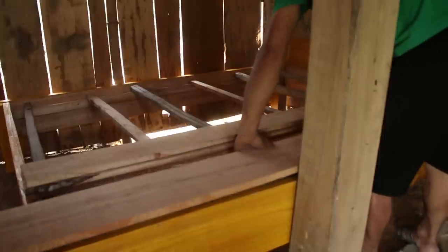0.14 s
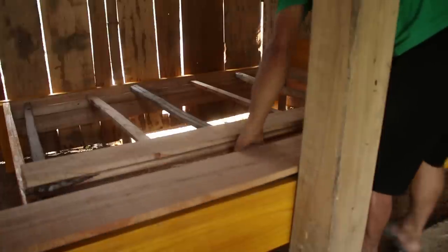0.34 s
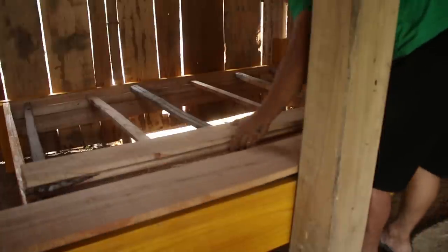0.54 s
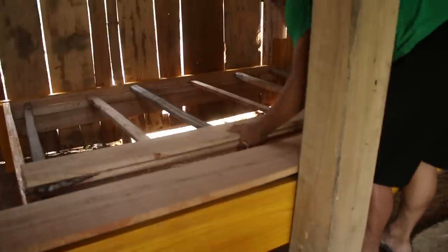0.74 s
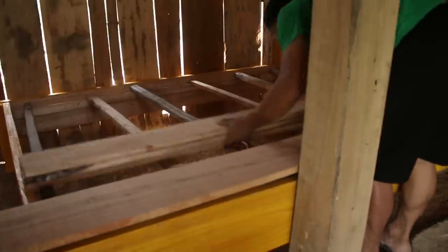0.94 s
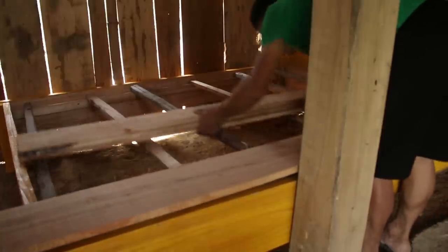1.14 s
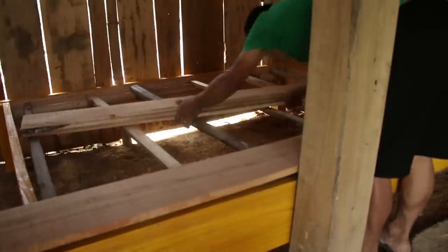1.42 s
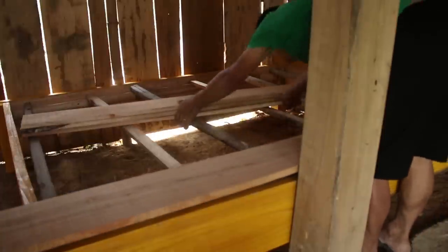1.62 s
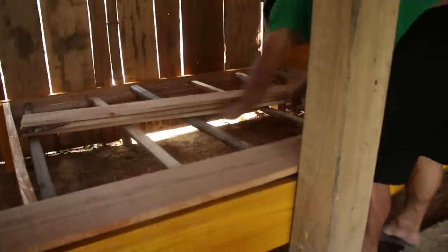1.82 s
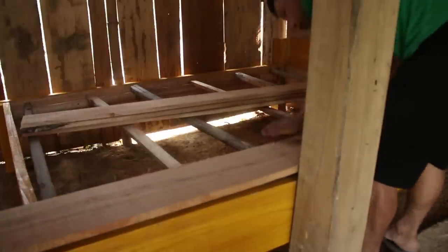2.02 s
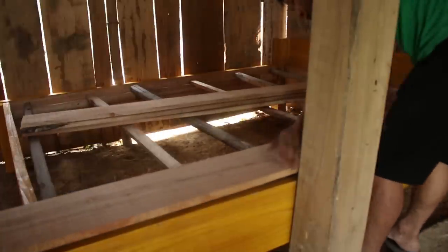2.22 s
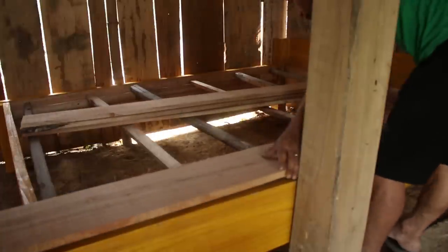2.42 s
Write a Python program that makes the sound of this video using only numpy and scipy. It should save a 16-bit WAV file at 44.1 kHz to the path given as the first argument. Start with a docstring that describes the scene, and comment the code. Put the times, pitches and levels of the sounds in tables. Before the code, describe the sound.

Wooden plank dropping with a rattle, sliding over bed slats and clacking against another board.

```python
"""A loose plank drops on a wooden bed frame and rattles, close to one microphone inside a board hut.
It scrapes across the slats, its fibres catching and slipping, then knocks against its neighbour;
each blow rings the modes of frame and plank. Light rubs, taps and soft thuds follow.
The board walls give every sound a short, dull tail, and faint outdoor air lies behind it all."""
import sys
import numpy as np
from scipy import signal
from scipy.io import wavfile
from scipy.ndimage import uniform_filter1d

SR = 44100
rng = np.random.default_rng(int(sys.argv[2]) if len(sys.argv) > 2 else 0)


def int16_out(signal):
    """Quantize to a 16-bit WAV file."""
    q = np.round(np.clip(np.atleast_2d(signal).T, -1, 1) * 32767)
    wavfile.write(sys.argv[1], SR, q.astype(np.int16))


N = 112454
T = np.arange(N) / SR
RING_WET_DB, CLATTER_WET_DB, RUB_WET_DB = -10, -11, -12.5  # hut tail against the direct sound

# modes of the bed frame and of the loose plank: (frequency [Hz], level [dB], t60 [s])
FRAME_MODES = [(121.6, -15.5, 0.11), (175, 1.5, 0.072), (184.4, -11.5, .27), (220, -10.5, 0.069),
               (380, 3, 0.074), (393.2, -13, 0.24), (416, -19.5, .33), (482.4, -15, 0.36), (643, -15, 0.16),
               (758, -21, .28), (1015, -22, 0.11), (1805, -12, .07)]
PLANK_MODES = [(390.2, -15.5, 0.3), (483, -13.5, 0.29), (551, -10, 0.18), (561, -17.5, .12),
               (625, -21, 0.42), (754, -14.5, 0.26), (901, -7, 0.18), (1018, -5.5, .2), (1081, -5.5, .18),
               (1147, -2, 0.16), (1201.5, -3, 0.067), (1293.6, -5, 0.1), (1379, -10.5, 0.1),
               (1562, -17, 0.12)]
# dense high-order ringing of the boards: (frequency [Hz], level [dB])
CLATTER_SPECTRUM = [(30, -30.5), (70, -21.5), (160, 0.5), (270, -2.5), (500, 4.5), (1100, 0.5), (1700, -1),
                    (2800, -15.5), (6000, -26.5), (15000, -43)]
# wood on wood, near the microphone:
# (time [s], frame gain [dB], plank gain [dB], clatter level [dB], clatter cutoff [Hz])
BLOWS = [(0.056, -46, -60, -48, 550), (0.2175, -11, -28.5, -20.5, 516), (0.233, -32, -36, -19, 1090),
         (0.245, -51, -40, -25.5, 1980), (0.2615, -40, -28, -24, 800), (0.284, -52, -40, -23, 920),
         (0.325, -44.5, -48, -36, 605), (1.3843, -28.5, -12, -17, 1650), (1.4005, -29.5, -20.5, -17, 1410),
         (1.422, -43, -26.5, -26.5, 910), (1.455, -34.5, -54, -33, 1300), (1.995, -76, -56, -60.5, 1540),
         (2.105, -62, -63, -56.5, 350), (2.3475, -50.5, -70, -46, 2020), (2.367, -46.5, -76, -49, 1830),
         (2.497, -83, -65.5, -54, 2500)]
def knocks(clatter_t60_s=0.064, rolloff_order=2.56):
    """Each blow rings frame and plank, with a burst of clatter whose brightness is set for each blow."""
    t = np.arange(SR // 2) / SR
    rings, bursts = np.zeros((2, N))
    frame, plank = ring(FRAME_MODES, t), ring(PLANK_MODES, t, alternate=True)
    fade = amp(-60 * t / clatter_t60_s)
    for start, frame_db, plank_db, clatter_db, cutoff_hz in BLOWS:
        def contact_db(hz):
            return read(CLATTER_SPECTRUM, hz) - 10 * rolloff_order * np.log10(1 + (hz / cutoff_hz) ** 2)
        clatter = colour(rng.standard_normal(len(t)), contact_db) * fade
        add(bursts, start, amp(clatter_db) * clatter * np.linalg.norm(fade) / np.linalg.norm(clatter))
        add(rings, start, .5 * (amp(frame_db) * frame + amp(plank_db) * plank))
    return hut(rings, RING_WET_DB) + hut(bursts, CLATTER_WET_DB)


def ring(modes, t, alternate=False, contact_s=.0009):
    """Struck wood rings in decaying sines; away from the struck point, neighbours alternate in sign."""
    sines = np.zeros(len(t))
    for k, (hz, db, t60) in enumerate(modes):
        sign = -1 if alternate and k % 2 else 1
        sines += sign * amp(db - 60 * t / t60) * np.sin(2 * np.pi * hz * t)
    return sines * np.tanh(t / contact_s) ** 2


# the long slide across the slats: (time [s], body level [dB], hiss level [dB])
SLIDE_LEVELS = [(0.852, -91, -88), (0.911, -53, -64), (0.973, -39.5, -76), (1.025, -43, -54),
                (1.125, -35.5, -50.5), (1.158, -38.5, -49.5), (1.2, -38.5, -52), (1.251, -37, -49.5),
                (1.3, -40, -52), (1.38, -37.5, -53), (1.47, -47.5, -57.5), (1.56, -49, -65),
                (1.62, -74, -94)]
# short rubs of wood and hands:
# (middle [s], half length [s], body level [dB], hiss level [dB], resonance [Hz])
SHORT_RUBS = [(0.048, 0.16, -62, -71.5, 834), (0.213, 0.097, -48, -62.5, 1540),
              (0.244, 0.064, -41.5, -68, 1460), (0.444, 0.27, -66.5, -68.5, 1670),
              (0.543, 0.1, -65.5, -72.5, 1950), (0.70, 0.21, -59, -67, 1350), (1.726, .13, -58, -68, 1087),
              (1.875, 0.21, -69, -71.5, 1378), (1.935, 0.087, -62, -71, 1037),
              (2.215, 0.036, -81.5, -98, 768), (2.317, 0.041, -68, -81, 906),
              (2.366, 0.053, -62.5, -67, 1540), (2.51, 0.14, -69.5, -81, 654)]
# hiss at the point of contact: (frequency [Hz], level [dB])
HISS_SPECTRUM = [(500, -37), (2000, 9), (3500, 4), (5000, 1.5), (7000, -3.5), (10000, -7.5), (11500, -16),
                 (15500, -16)]
def scraping(tone_db=-3, tone_q=5.4):
    """Friction drives the plank's body and a contact hiss; each short rub adds its own resonance."""
    times, slide_body_db, slide_hiss_db = np.transpose(SLIDE_LEVELS)
    body_gain = np.interp(T, times, amp(slide_body_db), left=0, right=0)
    hiss_gain = np.interp(T, times, amp(slide_hiss_db), left=0, right=0)
    slips, creaks, tones = grains(), grains(), np.zeros(N)
    for middle, half_length, body_db, hiss_db, tone_hz in SHORT_RUBS:
        stroke = swell(middle, half_length)
        body_gain += amp(body_db) * stroke
        hiss_gain += amp(hiss_db) * stroke
        b, a = signal.iirpeak(tone_hz, tone_q, fs=SR)
        resonance = unit(signal.lfilter(b, a, signal.lfilter(b, a, creaks)))
        tones += amp(body_db + tone_db) * stroke * resonance
    body = unit(colour(slips, plank_body_db))
    hiss = unit(colour(grains(), lambda hz: read(HISS_SPECTRUM, hz)))
    return tones + body_gain * body + hiss_gain * hiss


# broad colour of the rubbed wood: (frequency [Hz], level [dB])
BODY_SPECTRUM = [(60, -28), (120, -7), (170, -2.5), (270, -7.5), (400, 1), (600, 0.5), (800, 2), (1150, 1),
                 (1600, -1.5), (2300, -5.5), (3200, -12.5), (5000, -28), (15000, -66.5)]
# resonances the sliding plank sings with: (frequency [Hz], width [Hz], added gain [dB])
BODY_PEAKS = [(166, 31, -1), (423, 27, -4.5), (572, 19, -1.5), (1209, 28, -3), (1363, 25, -4),
              (1480, 18, 1), (1792, 27, -5), (2060, 47, -6.5), (2283, 16, -2), (2626, 63, -6.5)]
def plank_body_db(hz):
    """The plank answers friction with narrow resonances on top of a broad colour."""
    peaks = sum(amp(db) / (1 + (2 * (hz - centre) / width) ** 2) for centre, width, db in BODY_PEAKS)
    return read(BODY_SPECTRUM, hz) + 20 * np.log10(1 + peaks)


def grains(per_s=5000, spread_db=0.5, judder_db=1.43, judder_hz=44.84):
    """Wood fibres catch and slip: dense uneven clicks that come in clumps."""
    clicks = (rng.random(N) < per_s / SR) * rng.choice([-1, 1], N)
    strength = amp(spread_db * np.minimum(rng.exponential(1, N), 4))
    judder = np.interp(T * judder_hz * 2, np.arange(N), rng.standard_normal(N))
    return clicks * strength * amp(judder_db * judder)


# catches along the slide:
# (middle [s], half length [s], tone level [dB], tone [Hz], glide [Hz/s], hiss level [dB])
SLAT_CATCHES = [(0.968, 0.076, -45, 618, 0.5, -57.5), (1.034, 0.17, -44.5, 1068, -1700, -63.5),
                (1.116, 0.13, -41.5, 2128, 2400.5, -67), (1.118, .06, -39, 1406, -0.5, -68),
                (1.234, 0.14, -44, 1505, 0.5, -73), (1.246, 0.072, -46.5, 2264, 1801.5, -59)]
def catches(width_hz=100):
    """The grain catches on a slat: a narrow resonance holds or glides, with a surge of bright hiss."""
    out = np.zeros(N)
    treble_tilt = [(2000, -11), (7000, 7.5)]  # (frequency [Hz], gain [dB])
    hiss = unit(colour(grains(), lambda hz: read(HISS_SPECTRUM, hz) + read(treble_tilt, hz)))
    smooth = signal.butter(2, width_hz / 2, fs=SR, output="sos")
    for middle, half_length, tone_db, tone_hz, glide_hz_per_s, hiss_db in SLAT_CATCHES:
        phase = 2 * np.pi * np.cumsum(tone_hz + glide_hz_per_s * (T - middle)) / SR
        in_phase, quadrature = signal.sosfilt(smooth, rng.standard_normal((2, N)))
        resonance = unit(in_phase * np.cos(phase) + quadrature * np.sin(phase))
        out += swell(middle, half_length) * (amp(tone_db) * resonance + amp(hiss_db) * hiss)
    return out


# dull thuds in the frame and the hut floor: (time [s], level [dB], frequency [Hz], t60 [s])
LOW_THUDS = [(0.2185, -31, 108, 0.069), (0.317, -42.5, 87, 0.36), (1.386, -32.5, 120, 0.14),
             (1.476, -38.5, 104, 0.21), (1.536, -39.5, 50, 0.19), (2.112, -51.5, 152, 0.11),
             (2.378, -52.5, 91, 0.13)]
def thuds(rise_s=0.01):
    """Landing wood and shifting weight push softly into frame and floor, ringing one low mode each."""
    t, out = np.arange(SR // 2) / SR, np.zeros(N)
    for start, db, hz, t60 in LOW_THUDS:
        add(out, start, np.minimum(t / rise_s, 1) * ring([(hz, db, t60)], t))
    return out


# decay of the hut around the microphone: (frequency [Hz], t60 [s])
HUT_DECAY = [(60, 0.71), (180, 0.4), (500, 0.35), (1200, 0.24), (3000, 0.4), (12000, 0.16)]
def hut(direct, wet_db, delay_s=.012):
    """The nearby board walls return a diffuse tail, each band dying at its own speed."""
    hz, t, noise = signal.stft(rng.standard_normal(SR), SR, nperseg=256)
    tail = signal.istft(noise * amp(-60 * t / read(HUT_DECAY, hz)[:, None]), SR)[1]
    out = direct.copy()
    add(out, delay_s, amp(wet_db) * signal.fftconvolve(direct, tail / np.linalg.norm(tail)))
    return out


# the outdoors, heard from inside the hut: (frequency [Hz], level [dB])
AIR_SPECTRUM = [(20, -1), (55, 0.5), (80, 2.5), (105, 4), (150, -6), (250, -9), (400, -13.5), (800, -11.5),
                (1300, -21), (2500, -29.5), (5000, -30.5), (10000, -33.5), (15500, -33.5)]
def outdoor_air(level_db=-60.5, drift_db=1.5):
    """Faint, low background noise that drifts in patches of time and frequency."""
    hz, _, noise = signal.stft(rng.standard_normal(N), SR, nperseg=2048)
    patches = uniform_filter1d(rng.standard_normal(noise.shape), size=6, axis=0)
    patches = unit(uniform_filter1d(patches, size=8, axis=1))
    depth_db = drift_db / (1 + hz / 3000)  # the treble is steadier
    gain = amp(read(AIR_SPECTRUM, hz)[:, None] + depth_db[:, None] * patches)
    return amp(level_db) * unit(signal.istft(noise * gain, SR)[1][:N])


def swell(middle, half_length):
    """Smooth rise and fall of one stroke."""
    return np.maximum(1 - ((T - middle) / half_length) ** 2, 0) ** 5


def colour(x, db_at):
    """Minimum-phase filter whose gain in dB is a function of frequency."""
    hz = abs(np.fft.fftfreq(8192, 1 / SR))
    log_gain = np.maximum(db_at(hz), -100) * np.log(10) / 20
    taps = np.fft.ifft(np.exp(np.conj(signal.hilbert(log_gain)))).real[:4096]
    return signal.fftconvolve(x, taps)[:len(x)]


def amp(db):
    """Decibels to gain."""
    return 10 ** (np.asarray(db) / 20)


def unit(x):
    """Scales to an rms of one."""
    return x / np.sqrt(np.mean(x ** 2) + 1e-20)


def read(points, hz):
    """Reads a table on a log-frequency axis."""
    table_hz, value = np.transpose(points)
    return np.interp(np.log(hz + 1), np.log(table_hz + 1), value)


def add(mix, start_s, sound):
    """Mixes a sound in at a time."""
    part = mix[max(round(start_s * SR), 0):][:len(sound)]
    part += sound[:len(part)]


def scene():
    """At the microphone, in mono: knocks, thuds and scraping in the hut, over the outdoor air."""
    wood = knocks() + hut(thuds(), RING_WET_DB) + hut(scraping() + catches(), RUB_WET_DB)
    return (wood + outdoor_air())[None]


def record(dry):
    """The microphone's low cut and the recorder's band limit."""
    low_cut = signal.butter(2, 36, "high", fs=SR, output="sos")
    band_limit = signal.firwin(511, 15800, window=("kaiser", 9), fs=SR)
    return signal.oaconvolve(signal.sosfilt(low_cut, dry), band_limit[None], "same")


dry = scene()
out = record(dry)
int16_out(out)
```